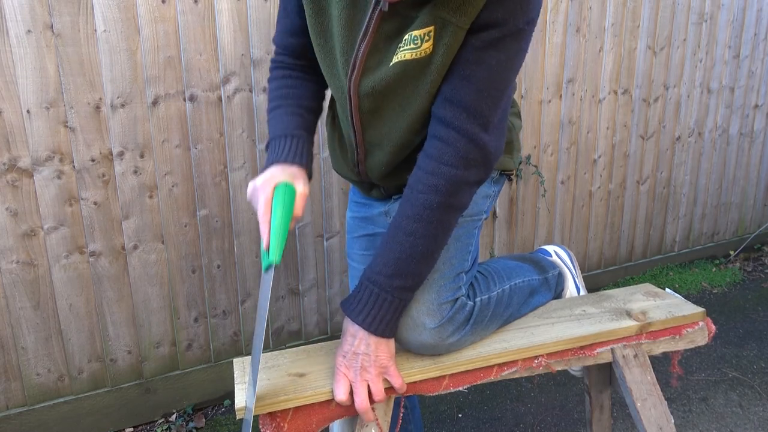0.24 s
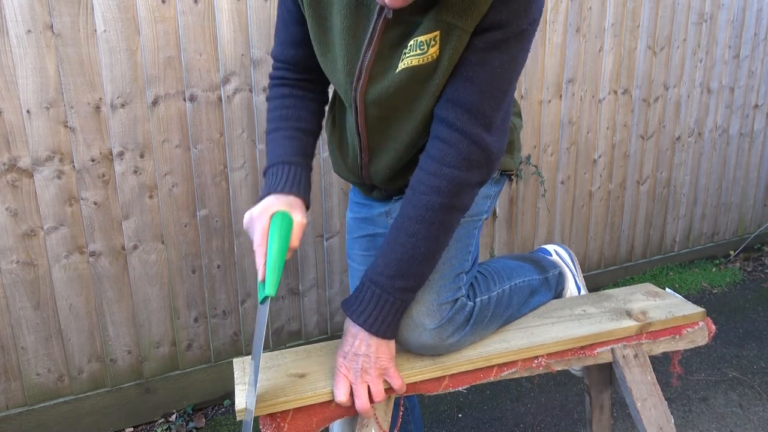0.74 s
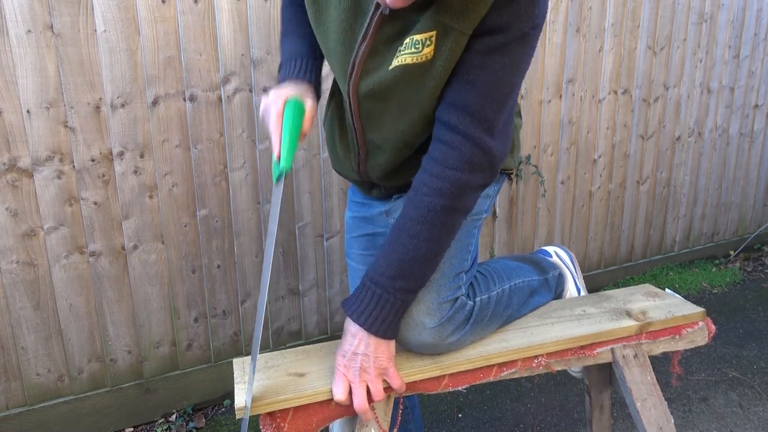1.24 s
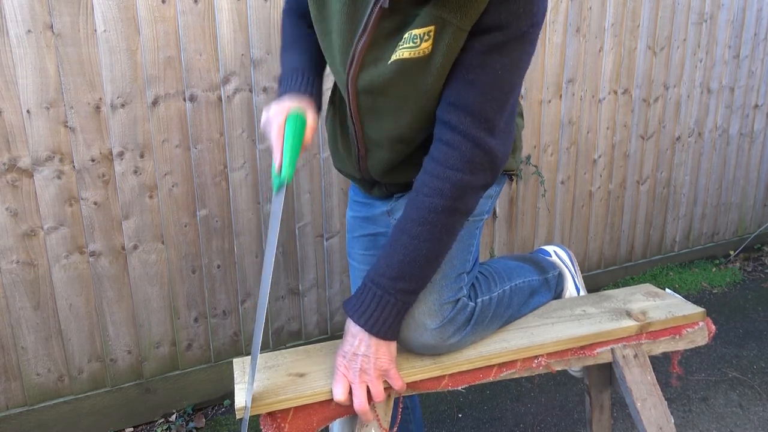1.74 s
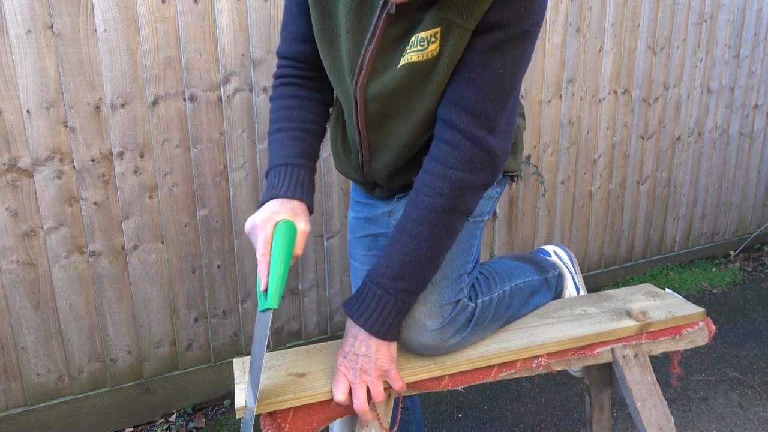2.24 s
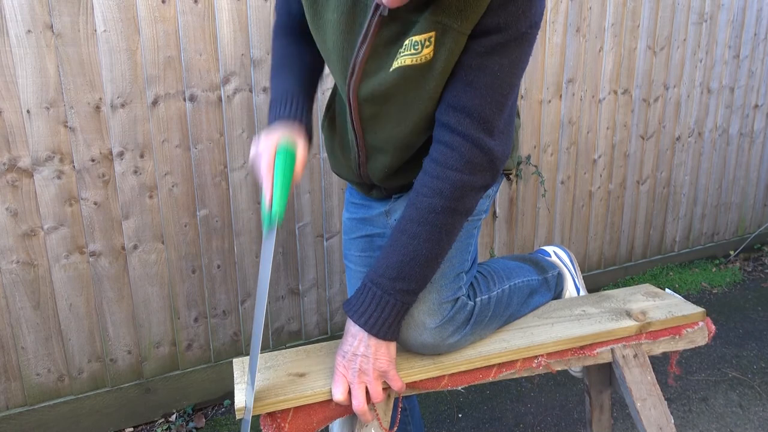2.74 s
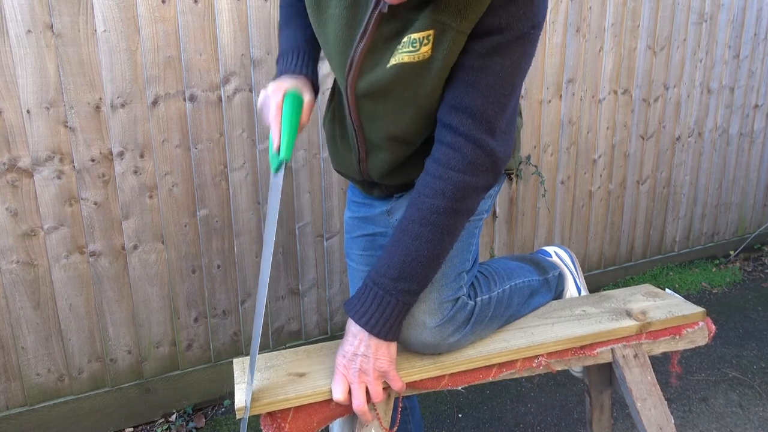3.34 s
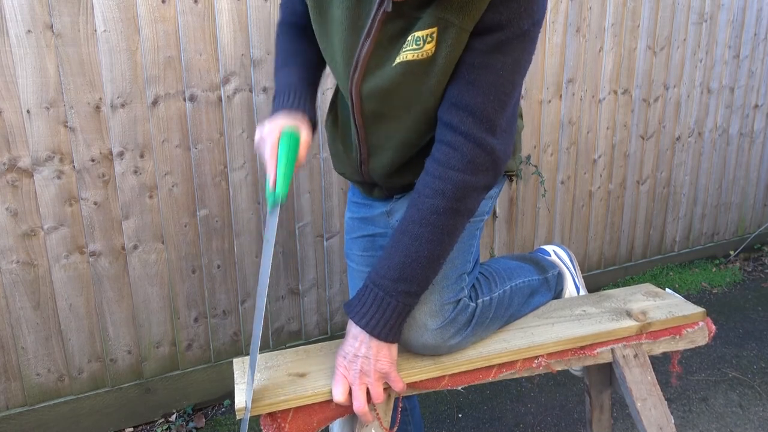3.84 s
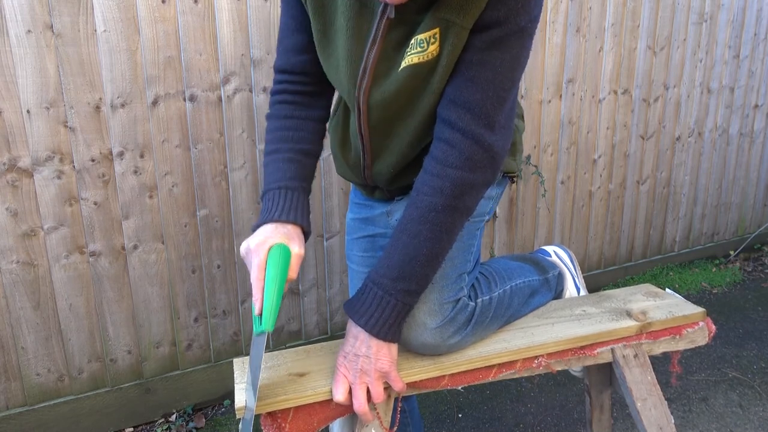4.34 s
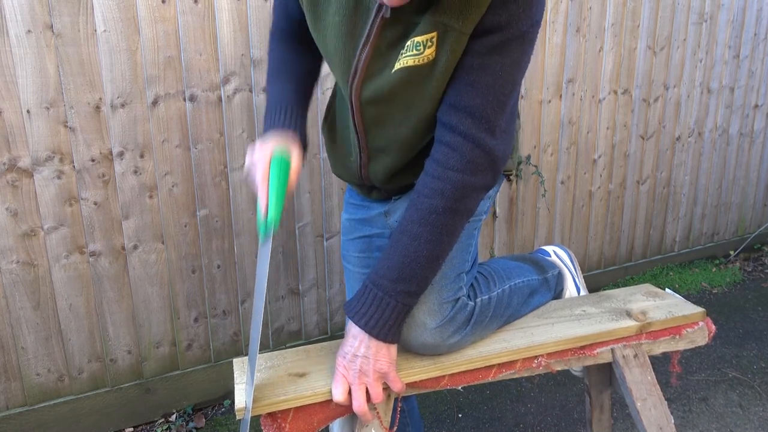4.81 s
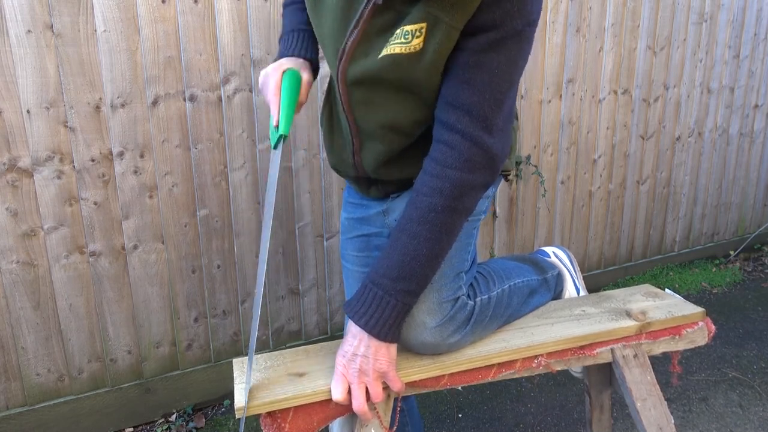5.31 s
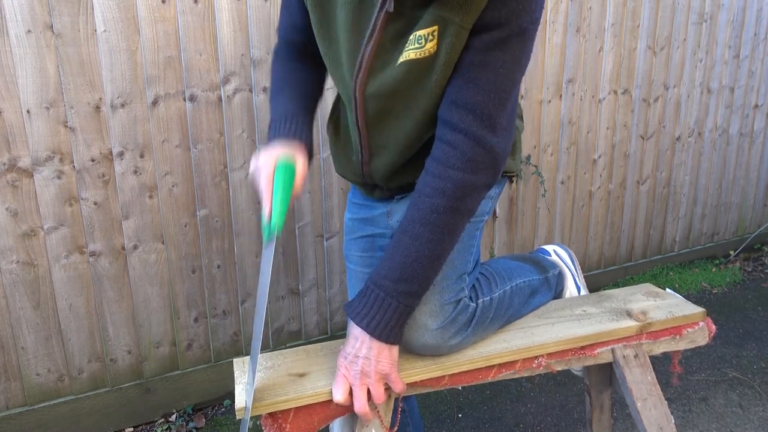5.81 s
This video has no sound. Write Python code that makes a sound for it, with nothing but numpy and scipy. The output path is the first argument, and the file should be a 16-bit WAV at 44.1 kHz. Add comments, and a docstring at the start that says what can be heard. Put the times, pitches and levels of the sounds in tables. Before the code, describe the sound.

A hand saw cuts a damp wooden board on a trestle, about three strokes back and forth every two seconds. Each push is a loud tearing rasp with a woody growl; each pull is softer and chatters. The cut turns more nasal as it deepens. Twice the blade catches with a short, high squeak and a slight steel ring. It is heard close up in a garden, with faint echoes over a low hush.

```python
"""The rasp of a hand saw, to and fro through a damp board on a trestle, in a garden with a wooden fence.
On each push the teeth strike and tear fibres at a rate that follows the arm, forcing the board to
vibrate; on the pull they mostly slide and the blade chatters. As the kerf deepens the cut turns nasal.
Now and then the blade snags as it turns back: stick-slip friction squeaks and the steel's modes ring.
Faint echoes from fence and paving follow, over a low outdoor hush."""
import sys
import numpy as np
from scipy import signal
from scipy.fft import rfft, irfft
from scipy.io import wavfile
from scipy.ndimage import uniform_filter1d, minimum_filter1d

SR = 44100
rng = np.random.default_rng(int(sys.argv[2]) if len(sys.argv) > 2 else 0)


def wav_out(sig):
    """Save sig, one row per channel (or a flat mono array), as 16-bit PCM at SR to the path in sys.argv[1]."""
    wavfile.write(sys.argv[1], SR, np.round(np.clip(np.atleast_2d(sig).T, -1, 1) * 32767).astype(np.int16))


N = 267731
HZ = np.fft.rfftfreq(4096, 1 / SR)  # frequency grid of the filter curves

# cutting strokes: start/s, end/s, top tooth rate/Hz, lateness of the top (exponent), rocking (0-1),
# trims of rasp/dB, rumble/dB, hiss/dB
PUSHES = [(-.111, 0.208, 285.7, 1.17, 0.07, -1, 3.5, -2.5), (0.518, 0.806, 385, 1.17, 0.6, 0.5, 2, -2),
          (1.188, 1.499, 433.7, 1.23, 0.53, 0.5, 1, -2), (1.892, 2.22, 403.8, 1.21, 0.31, -.5, 1, -1),
          (2.642, 2.933, 540.3, 1.34, 0.27, 0, 0.5, -.5), (3.313, 3.621, 535.8, 1.27, 0.4, 0, 1, .5),
          (4.016, 4.315, 551, 1.3, 0.32, -0.5, 0, 1), (4.694, 4.991, 561.4, 1.34, 0.33, 0, -1.5, 0.5),
          (5.341, 5.638, 603.7, 1.26, 0.47, 0, -1.5, 1), (6.011, 6.31, 548, 1.12, 0.7, -1, -9.5, 0)]
# return strokes: start/s, end/s, chatter depth/dB, trims of rasp/dB, rumble/dB, hiss/dB
PULLS = [(0.231, .526, 2.5, -0.5, 3, -2), (.844, 1.187, 2.5, 1, 1.5, -0.5), (1.562, 1.889, 1.4, 2, -1, 0),
         (2.301, 2.649, 2.5, .5, -1.5, 0), (2.98, 3.312, 0.7, 1, -0.5, 0), (3.665, 4.018, -0.2, -1.5, 0, 1),
         (4.384, 4.701, 1.5, -0.5, -1, 0.5), (5.035, 5.341, 1, -1, -0.5, 1),
         (5.697, 6.017, 0.9, 0.5, -2.5, 0)]

def sawing():
    """Reciprocating motion: pushes and pulls excite the board in turn."""
    wood = np.zeros(N)
    for row in PUSHES:
        add(wood, *push(*row))
    for row in PULLS:
        add(wood, *pull(*row))
    return wood

# envelope of a push: share of the stroke, rasp/dB, rumble/dB re rasp, hiss/dB re rasp
PUSH_ENVELOPE = [(0, -45, -6, -6.5), (.1, -29.5, 2, -5.5), (.22, -19.5, 2.5, -6.5), (.42, -14, -5.5, -7.5),
                 (.62, -14, -4.5, -6), (.8, -17.5, 1.5, -5), (.92, -23, -1.5, -5), (1.03, -29.5, -1, -12.5),
                 (1.3, -45.5, 0.5, -15.5)]
# spectra of a push in a shallow and a deep kerf: f/Hz, level/dB
PUSH_SHALLOW = [(47, -68), (80, -42), (146, -17), (199, 3.5), (309, -12.5), (538, 3), (802, -10.5),
                (1310, -12.5), (2720, -17.5), (3540, -15.5), (3870, -20.5), (4940, -19.5), (6310, -25.5),
                (12500, -31.5), (16000, -34)]
PUSH_DEEP = [(47, -82), (80, -66), (139, -43), (199, -8.5), (378, -17.5), (538, -6), (768, -8.5), (1600, 1),
             (1950, -6.5), (2270, -4.5), (3240, -15), (5280, -20), (6590, -25.5), (13400, -32),
             (16000, -38)]
DEEPENING_S = (0.77, 4.7)  # the kerf goes from shallow to deep between these times
BITE, OFFCUT_HZ, OFFCUT_DB = (0.14, 0.31), (1320, 1730), (1.5, 2)  # each: shallow, deep

def push(start, end, top_hz, lateness, rocking, *trims_db, boom_hz=199, boom_width_hz=67):
    """Resonance: the board booms as the tooth rate passes a low mode, and the loosening offcut rings."""
    t, (rasp_db, rumble_db, hiss_db) = envelopes(start, end, PUSH_ENVELOPE, trims_db)
    tooth_hz = tooth_rate(t, start, end, top_hz, lateness)
    boom_db = 4 * np.exp(-((tooth_hz - boom_hz) / boom_width_hz) ** 2)
    levels_db = rasp_db, rumble_db + boom_db, hiss_db
    bite, offcut_hz, offcut_db = (np.interp(start, DEEPENING_S, x) for x in (BITE, OFFCUT_HZ, OFFCUT_DB))
    colour_db = kerf_colour(start, PUSH_SHALLOW, PUSH_DEEP)
    colour_db += resonance(offcut_hz, width_hz=150, db=offcut_db)
    excitation = teeth(tooth_hz, bite, rocking)
    return t[0], board(excitation, levels_db, colour_db, judder_db=0.78, judder_hz=91, lurch_db=1.36)

# envelope of a pull: share of the stroke, rasp/dB, rumble/dB re rasp, hiss/dB re rasp
PULL_ENVELOPE = [(-0.06, -53, -9, -5), (0.08, -30.0, 2.5, -2.5), (0.3, -25.5, -1, -3.5),
                 (0.52, -21.0, -4, -3.5), (0.8, -25, -2.0, -4.5), (0.92, -33.5, 3.5, -6.5),
                 (1.05, -49, 5.5, -13)]
# spectra of a pull in a shallow and a deep kerf: f/Hz, level/dB
PULL_SHALLOW = [(47, -24), (80, -4.5), (112, -15), (212, -2.5), (353, -15), (482, -7.5), (615, -5.5),
                (1170, -11.5), (1990, -8.5), (2330, -9.5), (3540, -9.5), (4330, -13), (4730, -9),
                (6170, -17.5), (16000, -28)]
PULL_DEEP = [(47, -74), (80, -24), (166, -8), (303, -23), (461, -6.5), (672, -7), (802, -10.5), (1280, -6),
             (1430, -9.5), (1600, -3.5), (2660, -8), (4940, -10.5), (6590, -15.5), (12500, -21),
             (16000, -28)]
# the blade binds (+) or skates (-) in the damp kerf: t/s, half length/s, gain/dB
BINDS = [(0.323, 0.081, 5), (1.01, 0.065, 2.5), (2.411, 0.023, -16), (2.458, 0.017, 8), (2.497, 0.038, -15),
         (3.046, .038, 3.5), (3.802, 0.037, -5), (3.84, 0.023, 3.5), (5.159, 0.047, -4),
         (5.204, 0.019, 4.5), (5.823, 0.054, -4), (5.833, 0.015, 1)]

def pull(start, end, chatter_db, *trims_db, chatter_hz=43.94, drift=0.203):
    """Sliding friction: the backs of the teeth drag, and the slack blade's flutter modulates the rasp."""
    t, (rasp_db, rumble_db, hiss_db) = envelopes(start, end, PULL_ENVELOPE, trims_db)
    bind_db = sum(db * np.exp(-((t - s) / half_s) ** 2) for s, half_s, db in BINDS)
    flutter_hz = chatter_hz * (1 + drift * waver(len(t), 18))
    flutter = np.cos(2 * np.pi * np.cumsum(flutter_hz) / SR)
    levels_db = rasp_db + bind_db + chatter_db * flutter, rumble_db, hiss_db
    tooth_hz = tooth_rate(t, start, end, top_hz=517.4, lateness=0.97)
    excitation = teeth(tooth_hz, bite=0.095, rocking=0.025)
    colour_db = kerf_colour(start, PULL_SHALLOW, PULL_DEEP)
    return t[0], board(excitation, levels_db, colour_db, judder_db=1.22, judder_hz=81, lurch_db=2.1)

def envelopes(start, end, shape, trims_db):
    """Time scaling: a shape stretched over one stroke gives times and rasp, rumble and hiss in dB."""
    share, *columns = np.transpose(shape)
    knots_s = start + share * (end - start)
    t = np.arange(max(knots_s[0], 0), knots_s[-1], 1 / SR)
    return t, [np.interp(t, knots_s, column) + db for column, db in zip(columns, trims_db)]

def tooth_rate(t, start, end, top_hz, lateness, slowest_hz=122):
    """Tooth-passing frequency: it follows the arm's speed, which rises and falls in one arch."""
    progress = np.clip((t - start) / (end - start), 0, 1)
    return np.maximum(top_hz * np.sin(np.pi * progress ** lateness), slowest_hz)

# how readily the board rocks with the teeth: tooth rate/Hz, factor (0-1)
MOBILITY = [(125, 0), (155, .8), (200, 1), (250, .9), (310, .4), (380, .55), (440, .7), (520, .45),
            (620, .2)]

def teeth(tooth_hz, bite, rocking, jitter=.014, unevenness=0.58, tooth_set=0.23, rub=0.98):
    """Impact excitation: each tooth knocks and tears fibres; bite weights the knocks against tearing."""
    count = len(tooth_hz)
    tooth_hz = tooth_hz * (1 + jitter * waver(count, 90))
    passed = np.cumsum(tooth_hz) / SR
    side = np.cos(np.pi * np.floor(passed))  # teeth set left and right bite unequally
    force = 1 + tooth_set * side + unevenness * rng.standard_normal(count)
    knocks = np.diff(np.floor(passed), prepend=0) * force
    knocks = (knocks - tooth_hz / SR) * np.sqrt(SR / tooth_hz)  # zero mean, same power at any rate
    knocks = signal.lfilter(*signal.butter(1, 2300, fs=SR), knocks)  # damp wood blunts the knock
    bursts = rub + np.exp(-(passed % 1) / 0.83)
    tearing = unit_rms(fibres(count, per_s=12000, spread_db=2.5) * bursts)
    drive = np.sqrt(bite) * knocks + np.sqrt(1 - bite) * tearing
    # the rocking board growls at the tooth rate; no two teeth pull alike
    phase = 2 * np.pi * passed + 0.19 * waver(count, 113)
    growl = unit_rms(np.cos(phase) * (1 + 0.33 * waver(count, 58)))
    growl_share = np.clip(rocking * curve_at(MOBILITY, tooth_hz), 0, .9)
    return drive, growl, growl_share

def fibres(count, per_s, spread_db):
    """Shot noise: fibres snap at random instants, many weakly and a few strongly."""
    size = gain_of(spread_db * np.minimum(rng.exponential(1, count), 4))
    return unit_rms(size * rng.choice([-1., 1.], count) * (rng.random(count) < per_s / SR))

# resonances and dips of the board on its trestle: f/Hz, width/Hz, gain/dB
BOARD_MODES = [(101, 53, -5), (202, 39, 5), (312, 56, 0.5), (368, 29, -0.5), (464.4, 78, 6.5),
               (545, 26, 4.5), (680, 52, 0.5), (854, 45, -1), (884, 9, 4), (1120, 50, 5), (1150, 66, -6.5),
               (1374, 160, 3), (1410, 42, -8), (1598, 23, 5.5), (1785, 22, 7), (2010, 85, 3), (2218, 28, 6),
               (2314, 110, -3.5), (2735, 130, -4.5), (3000, 57, 2), (3270, 175, -5), (3506, 260, 3.5),
               (3800, 150, -1.5), (4625, 65, 2.5), (4810, 175, 4.5), (5370, 470, 4), (6400, 310, -1),
               (8300, 1050, -2.5)]

def board(excitation, levels_db, colour_db, judder_db, judder_hz, lurch_db, lurch_hz=22, fade_s=0.004):
    """Forced vibration: the modes filter the drive; the grain makes it judder and the board lurch."""
    drive, growl, growl_share = excitation
    rasp_db, rumble_db, hiss_db = levels_db
    count = len(drive)
    t = np.arange(count) / SR
    modes_db = sum(resonance(*row) for row in BOARD_MODES)
    response = coloured(drive, colour_db + modes_db)
    rumble, rasp, hiss = (steadied(band, seconds=0.031) for band in three_bands(response))
    rumble = steadied(np.sqrt(1 - growl_share) * rumble + np.sqrt(growl_share) * growl, seconds=0.024)
    rumble *= gain_of(lurch_db * waver(count, lurch_hz))
    sound = rumble * gain_of(rumble_db - .3) + rasp * gain_of(-.3) + hiss * gain_of(hiss_db - .1)
    fade = np.sqrt(np.minimum(np.minimum(t, t[::-1]) / fade_s, 1))
    judder = unit_rms(gain_of(judder_db * waver(count, judder_hz)))
    return sound * fade * gain_of(rasp_db) * judder

def kerf_colour(s, shallow, deep, ripple_db=2.5):
    """Spectral envelope: it shifts with kerf depth, and each lie of the blade adds fine resonances."""
    depth = np.interp(s, DEEPENING_S, (0, 1))
    ripple = unit_rms(smoothed(rng.standard_normal(len(HZ)), size=7)) * HZ / (HZ + 700)
    return (1 - depth) * curve_at(shallow, HZ) + depth * curve_at(deep, HZ) + ripple_db * ripple

# squeaks of the blade: t/s, length/s, first f/Hz, target f/Hz, glide time constant/s, level/dB,
# decay/(dB/s), roughness, overtones/dB
SQUEAKS = [(2.294, 0.015, 4100, 4020, .007, -6.5, 200, 0.1, -5.5),
           (2.323, 0.043, 4000, 4050, 0.023, -17.5, 114, 0.08, -14),
           (2.374, 0.0075, 13160, 12130, 0.0065, 0, 100, 0.43, -60),
           (2.383, .011, 11100, 10000, .006, -11, 0, .5, -60),
           (2.393, 0.0064, 10030, 9750, 0.0057, -1, 100, .3, -60),
           (2.402, 0.13, 10200, 9870, 0.0154, -12.5, 100, 0.6, -60),
           (2.469, .009, 14300, 13600, 0.0054, -2, 300, .5, -60),
           (2.479, 0.03, 9800, 12900, 0.033, -10.5, 30, .5, -60),
           (2.523, 0.013, 13300, 14000, .003, -5, 450, .25, -60),
           (2.55, 0.0053, 11300, 10640, .006, -1, 600, 0.8, -60),
           (4.354, .012, 5200, 4970, 0.0061, -12.5, 100, 0.8, -21),
           (4.358, 0.013, 4300, 3790, 0.013, -14.5, 50, 1.1, -23),
           (4.362, 0.013, 5470, 5700, .005, -19, 100, .2, -30),
           (4.364, 0.04, 9300, 9310, .008, -10.5, 280, .18, -60),
           (4.374, .02, 12400, 12520, .005, -9.5, 200, 0.5, -60)]

def squeak(s, length, first_hz, target_hz, glide_s, db, decay, roughness, overtones_db):
    """Stick-slip oscillation: the pinched blade grips and slides at a gliding, unsteady pitch."""
    t = np.arange(int((length + 0.038) * SR)) / SR
    hz = target_hz + (first_hz - target_hz) * np.exp(-t / glide_s)
    hz *= 1 + 0.041 * roughness * waver(len(t), 990)
    phase = 2 * np.pi * np.cumsum(hz) / SR
    tone = np.sin(phase)
    for k in (2, 3):
        tone += gain_of(overtones_db * np.sqrt(k - 1)) * np.sin(k * phase) * (k * hz < SR / 2)
    tone = unit_rms(tone * (1 + roughness * waver(len(t), 410)))
    attack = np.minimum(t / 0.0034, 1)
    release = np.exp(-np.maximum(t - length, 0) / 0.0043)
    return s, attack * release * gain_of(db - decay * t) * tone

# teeth catching in the kerf: t/s, level/dB, centre f/Hz, spread/octaves, T60/s, ring/dB
SNAGS = [(.249, -19.5, 2000, 1.35, 0.047, -40), (.875, -13.5, 7000, 0.98, 0.041, -27),
         (.92, -15, 550, 1.1, .05, -40), (1.122, -7.5, 450, 0.72, 0.041, -40),
         (1.909, -24, 1500, 1.3, .06, -40), (2.292, -5.5, 6860, 1.4, 0.045, -21.5),
         (2.29, -12.5, 1600, 0.84, 0.028, -40), (2.312, -21.5, 11800, 0.29, .1, -1.5),
         (2.44, -16.5, 2000, 0.33, .15, -40), (2.472, -1, 12500, .15, .036, -20),
         (2.527, -21, 14000, .06, .04, -5), (2.555, -15, 10500, 0.14, .074, -8),
         (2.671, -22, 550, 0.63, .06, -40), (3.354, -16, 700, 0.78, .06, -40),
         (3.682, -21, 7000, 0.86, .07, -20), (3.7, -22, 12000, .46, .08, -15),
         (3.829, -12, 1180, 0.98, 0.088, -40), (4.356, -7, 6960, 1.34, .085, -24),
         (4.369, -16, 11000, 0.5, 0.099, -9), (4.388, -15, 15000, .2, .07, -8),
         (4.952, -17, 8000, .63, 0.029, -38)]
# modes of the steel blade: f/Hz, level/dB, T60/s
BLADE_MODES = [(4000, -7, .17), (5450, 6, 0.16), (6740, -24, .16), (8300, -46, .17), (8940, -17, 0.17),
               (9760, 4, .21), (10570, 4, 0.23), (10900, -18, 0.25), (11270, -32, .14), (12300, -15, 0.25),
               (12200, 4, .14), (12800, -8, .14), (14200, -4, .25), (15400, -6, .12)]

def snag(s, db, centre_hz, octaves, t60, ring_db):
    """Free vibration: a tooth catches and lets go with a scrape, and blade modes in its band ring on."""
    def band_db(hz):
        return np.maximum(-4.3 * (np.log2((hz + 1) / centre_hz) / octaves) ** 2, -50)
    t = np.arange(int(.3 * SR)) / SR
    snaps = fibres(len(t), per_s=6300, spread_db=4.5)
    scrape = unit_rms(coloured(snaps, band_db(HZ))) * gain_of(-60 * t / t60)
    ring = np.zeros(len(t))
    for hz, mode_db, mode_t60 in BLADE_MODES:
        envelope = gain_of(mode_db + band_db(hz) - 60 * t / mode_t60)
        ring += envelope * np.sin(2 * np.pi * (hz * t + rng.random()))
    attack = np.minimum(t / 0.0023, 1)
    return s, gain_of(db) * attack * (scrape + gain_of(ring_db) * ring)

# reverberation time of the garden: f/Hz, T60/s
GARDEN_T60 = [(150, .28), (1000, .26), (4000, .15), (7000, .16), (10500, .24), (14000, .22)]

def garden_echoes(x, first_s=.009, per_s=3000):
    """Reverberation: fence and paving scatter echoes, each band decaying at its own rate."""
    count = SR // 2
    echoes = rng.choice([-1., 1.], count) * (rng.random(count) < per_s / SR)
    echoes *= np.arange(count) > first_s * SR
    hz, t, spectra = signal.stft(echoes, SR, nperseg=256)
    decay = gain_of(-60 * t / curve_at(GARDEN_T60, hz)[:, None])
    tail = signal.istft(spectra * decay, SR, nperseg=256)[1]
    return signal.fftconvolve(x, tail / np.linalg.norm(tail))[:N]

# spectrum of the outdoor background: f/Hz, level/dB
AIR_SPECTRUM = [(20, -4.5), (45, -12), (100, -11.5), (250, -4), (1000, -37), (4000, -24), (16000, -59)]

def outdoor_air():
    """Stationary noise: a steady hush, strongest in the bass."""
    return unit_rms(coloured(rng.standard_normal(N), curve_at(AIR_SPECTRUM, HZ)))

def gain_of(db):
    """Decibels to amplitude ratio."""
    return 10 ** (np.asarray(db) / 20)

def unit_rms(x):
    """Normalisation to rms 1."""
    return x / np.sqrt(np.mean(x ** 2) + 1e-20)

def smoothed(x, size):
    """Triangular moving average."""
    return uniform_filter1d(uniform_filter1d(x, size), size)

def steadied(x, seconds):
    """Normalisation to a running rms of 1."""
    return x / np.sqrt(abs(smoothed(x ** 2, int(seconds * SR))) + 1e-20)

def waver(count, hz):
    """Random modulation: noise of rms 1, low-passed at hz."""
    f = np.fft.rfftfreq(count, 1 / SR)
    return unit_rms(irfft(rfft(rng.standard_normal(count)) / (1 + (f / hz) ** 4), count))

def curve_at(points, hz):
    """Interpolation on a log-frequency axis."""
    f, value = np.transpose(points)
    return np.interp(np.log(hz + 1), np.log(f + 1), value)

def resonance(hz, width_hz, db):
    """A resonance as a bell in dB on the grid HZ, its width taken at half height."""
    return db * np.exp(-np.log(16) * ((HZ - hz) / width_hz) ** 2)

def coloured(x, db):
    """Minimum-phase filter shaped by db on the grid HZ: clicks ring after they strike."""
    log_gain = np.log(gain_of(np.maximum(db - db.max(), -90)))
    mirrored = np.r_[log_gain, log_gain[-2:0:-1]]
    response = np.exp(np.conj(signal.hilbert(mirrored)))[:len(HZ)]
    return signal.fftconvolve(x, irfft(response))[:len(x)]

def three_bands(x, edges_hz=(700, 3500)):
    """Complementary filters: a split into rumble, rasp and hiss."""
    hz = np.fft.rfftfreq(len(x), 1 / SR)
    low, below_hiss = (1 / (1 + (hz / edge) ** 10) for edge in edges_hz)
    return [irfft(rfft(x) * band, len(x)) for band in (low, below_hiss - low, 1 - below_hiss)]

def add(mix, s, sound):
    """Superposition of a sound from time s."""
    part = mix[max(round(s * SR), 0):][:len(sound)]
    part += sound[:len(part)]

def scene():
    """Superposition: wood, steel, their echoes and the air sum at one listening point."""
    wood, steel = sawing(), np.zeros(N)
    for row in SQUEAKS:
        add(steel, *squeak(*row))
    for row in SNAGS:
        add(steel, *snag(*row))
    air = gain_of(-40.5) * outdoor_air()
    echoes = garden_echoes(gain_of(-18) * wood + gain_of(-12.5) * steel)
    mono = wood + gain_of(-2.0) * steel + echoes + air
    return np.array([mono, mono])

def record(dry):
    """Peak limiting and band limiting: a fast gain dip holds down the peaks, then a low-pass follows."""
    ceiling, cutoff_hz = .96, 15950
    gain = np.minimum(1, ceiling / (abs(dry).max(0) + 1e-9))
    limited = dry * uniform_filter1d(minimum_filter1d(gain, size=65), size=65)
    low_pass = signal.firwin(301, cutoff_hz, window=("kaiser", 9), fs=SR)
    return signal.oaconvolve(limited, low_pass[None], "same")

dry = scene()
out = record(dry)
wav_out(out)
```